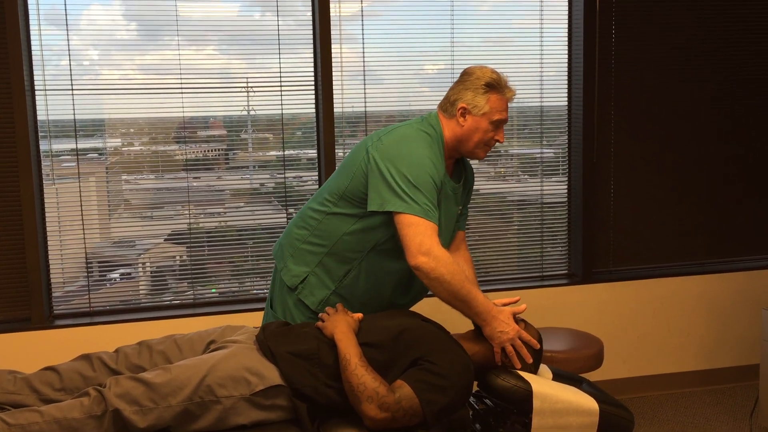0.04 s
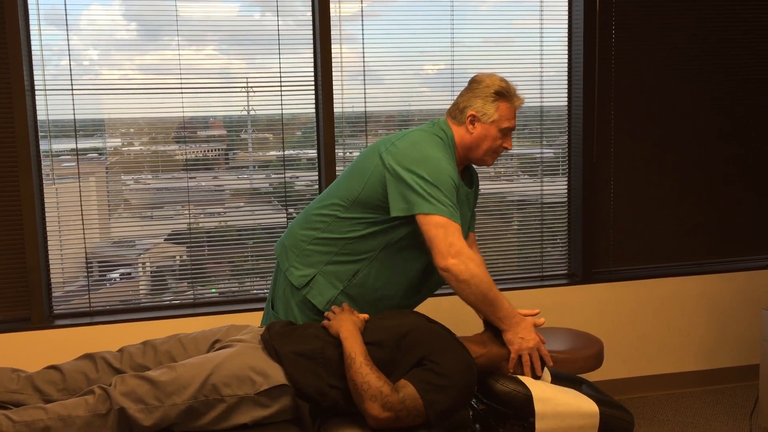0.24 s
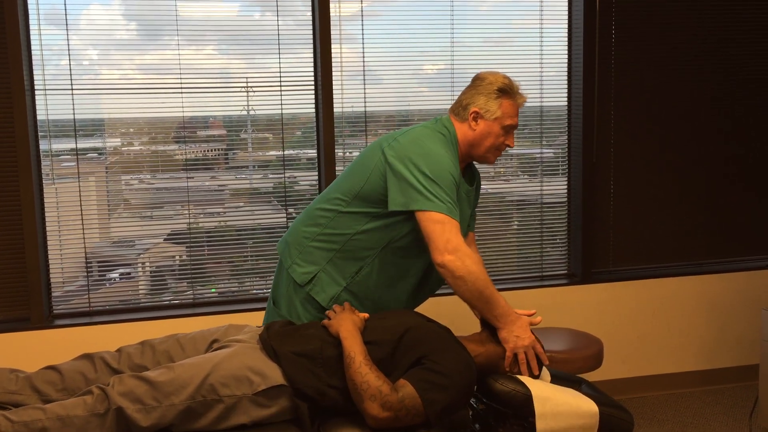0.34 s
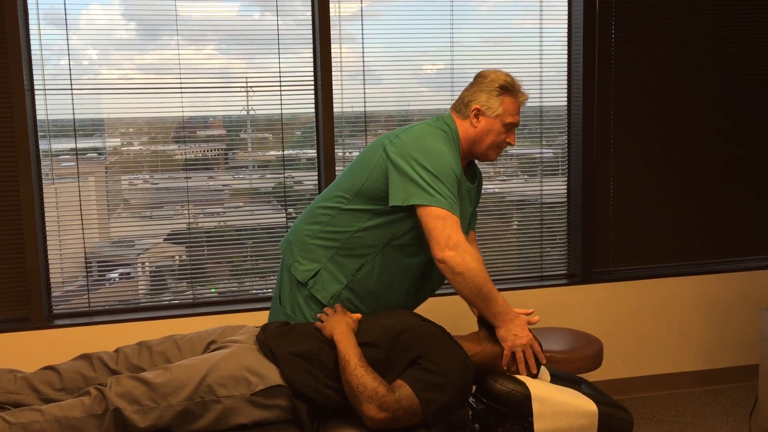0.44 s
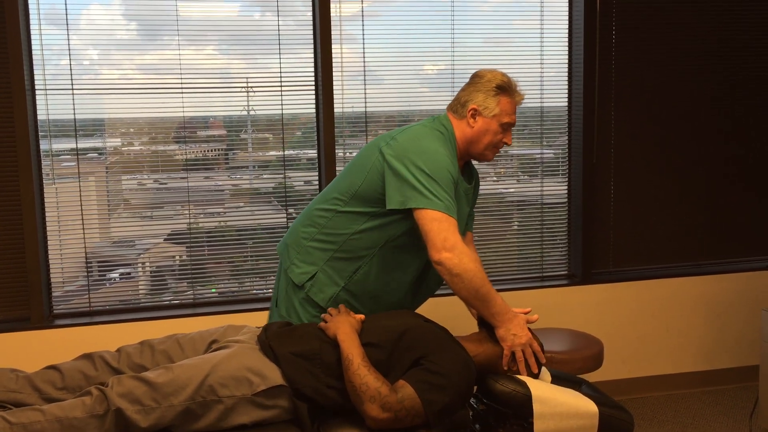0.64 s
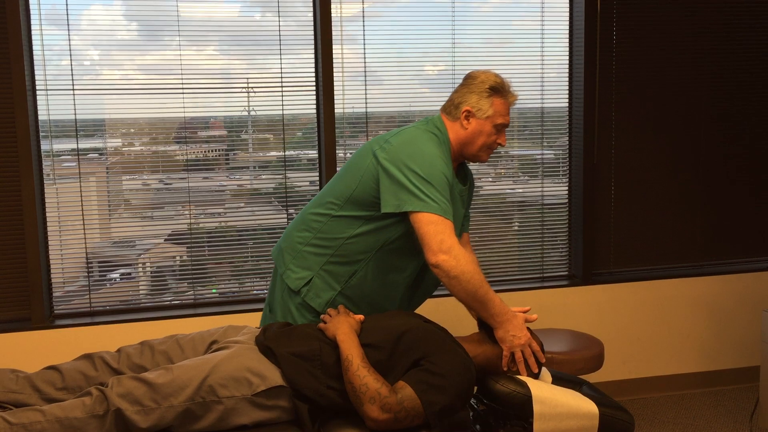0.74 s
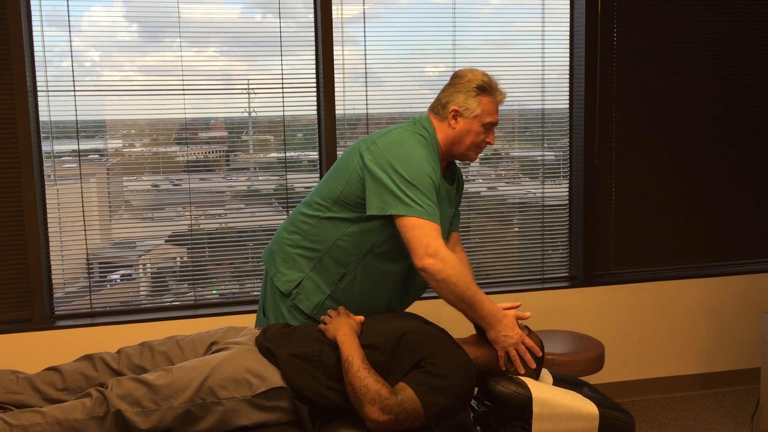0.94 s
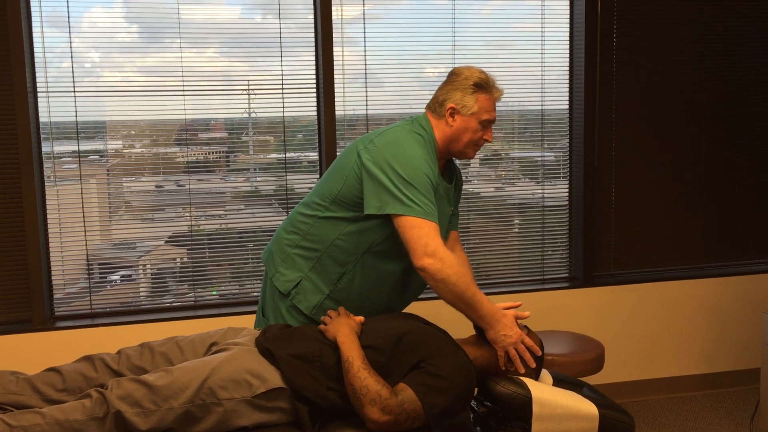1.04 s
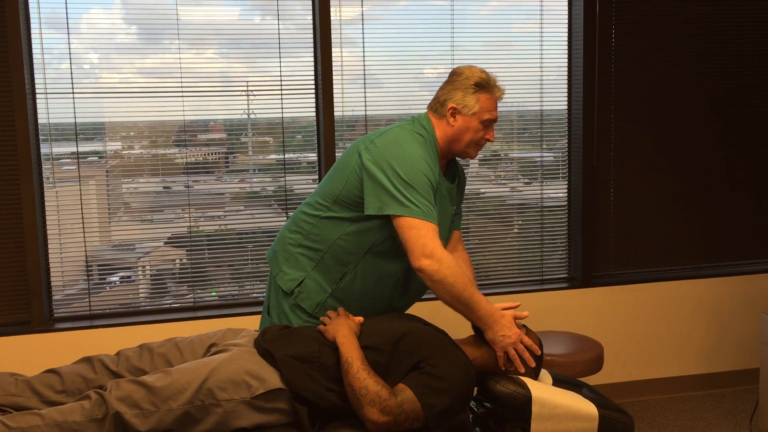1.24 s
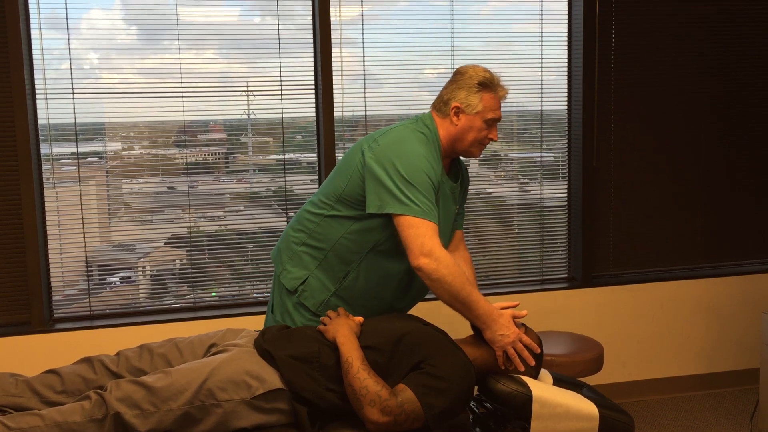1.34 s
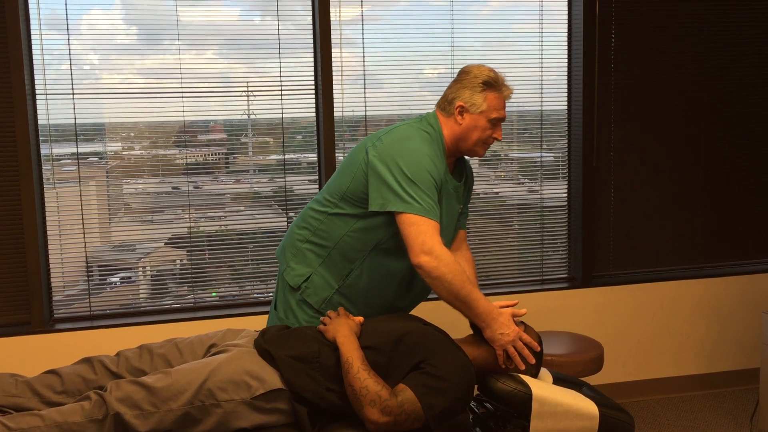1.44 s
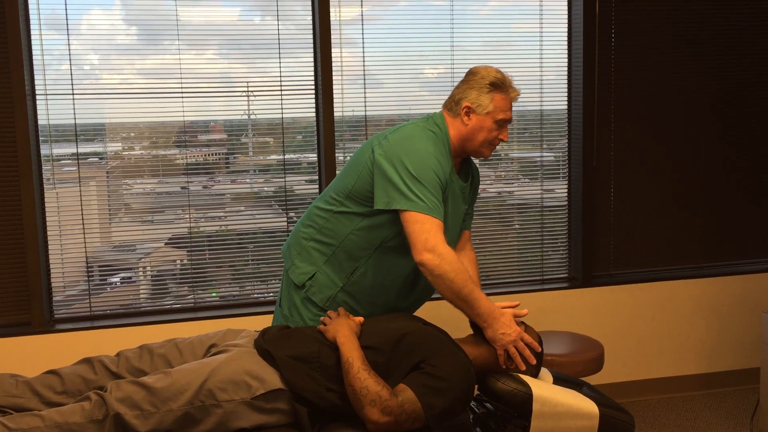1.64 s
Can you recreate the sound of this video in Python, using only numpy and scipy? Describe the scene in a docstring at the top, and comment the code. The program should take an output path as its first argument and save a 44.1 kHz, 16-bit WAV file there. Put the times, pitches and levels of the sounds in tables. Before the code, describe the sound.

A padded treatment table section scrapes briefly and drops with a loud thud and clack at about 0.25 seconds, ringing shortly in a small room. Headrest paper and upholstery rustle, tick and squeak faintly from 0.4 to 1.3 seconds. At 1.4 seconds the mechanism gives a lighter, hollow knock, and a brief bright metal clatter starts near 1.7 seconds. Low ventilation rumbles quietly throughout.

```python
"""Treatment table drop

In a small clinic room, a padded head section slides and drops onto its stop with a loud thud and clack.
Upholstery and headrest paper rustle, squeak and creak faintly under the hands. The mechanism knocks once
more, lighter and hollower, and a bright metal clatter starts. Ventilation rumbles underneath."""
import sys
import numpy as np
from scipy import signal
from scipy.fft import rfft, irfft
from scipy.io import wavfile
from scipy.ndimage import uniform_filter1d

SR = 44100
rng = np.random.default_rng(int(sys.argv[2]) if len(sys.argv) > 2 else 0)


def output_pcm(signal):
    """Save a mono or channel-first signal as 16-bit PCM at the path in sys.argv[1].

    Samples are clipped to [-1, 1] before scaling.
    """
    pcm = np.clip(np.atleast_2d(signal).T, -1, 1) * 32767
    wavfile.write(sys.argv[1], SR, np.round(pcm).astype(np.int16))


N = 74970


def drop(clack_db=10, thud_db=10):
    """The section hits its stop, rattles and rings; the cushion bounces."""
    hits = [(0.2391, 3), (0.2453, -13), (0.2497, -14), (0.2565, -14.5)]  # contacts with the stop (time [s], level [dB])
    clack_eq = [(50, -13), (100, -5.5), (160, 5.5), (280, 1), (400, 8), (600, 3.5), (780, 3.5), (1000, -3),
                (1380, 6), (1800, -2), (2350, 2), (3200, 1), (4500, 2.5), (5400, -0.5), (7200, -2),
                (9400, 1), (10600, -13.5), (14000, -10.5), (16000, -22)]  # contact spectrum (frequency [Hz], gain [dB])
    bounces = [(0.256, -18), (0.28, -8), (0.313, -15.5), (0.385, -35), (0.44, -44)]  # cushion bounces (time [s], level [dB])
    thud_eq = [(35, -25.5), (80, 11), (160, 13.5), (220, 15), (300, 8.5), (420, 9), (800, 7.5), (1400, -11),
               (5000, -39.5)]  # bounce spectrum (frequency [Hz], gain [dB])
    modes = [(167, -25.5, .42), (216.2, -30.5, .36), (250.4, -31.5, .3), (341, -31, 0.25), (439.7, -34, .3),
             (590, -25, .22), (769, -32.5, 0.3), (1342, -28, .21), (1582, -30.5, .19), (2088, -30.5, 0.23),
             (2140, -31, 0.25), (2430, -27.5, 0.23), (2874, -28.5, 0.15), (3616, -34, 0.24),
             (3680, -26.5, 0.13), (4284, -31, .24), (4610, -24, 0.14), (4880, -34.5, 0.35),
             (5630, -30, 0.16), (6750, -28, .13), (7750, -35, .17), (8180, -25, 0.13), (9460, -32, 0.18),
             (10691, -38, .18)]  # section modes (frequency [Hz], level [dB], t60 [s])
    clack = amp(clack_db) * colour(struck(hits, t60_s=0.033, wet_db=-3.5), clack_eq)
    thud = amp(thud_db) * colour(struck(bounces, t60_s=0.082, wet_db=-2), thud_eq)
    return clack + thud + ring(modes, start_s=hits[0][0])


def knock(gain_db=10):
    """A lighter, hollow knock of the mechanism rings the frame."""
    hits = [(1.4223, -18), (1.4243, -10.5), (1.4318, -31), (1.462, -28)]  # mechanism contacts (time [s], level [dB])
    eq = [(70, -17.5), (140, -6), (230, 13), (370, 1.5), (500, 8), (690, 9.5), (960, 9.5), (1300, -7),
          (1650, 7), (2100, 5), (2300, 1), (2800, 5.5), (3250, -5.5), (3650, 0), (4200, -10), (5400, -5),
          (7000, -9.5), (8800, -9), (10500, -19.5), (14000, -19), (16000, -36.5)]  # contact spectrum (frequency [Hz], gain [dB])
    modes = [(221.7, -45, 0.42), (478, -41, 0.28), (579, -35.5, 0.2), (888, -47.5, 0.28), (962, -45, 0.46),
             (1668, -40.5, 0.3), (2015, -46, .24), (2141, -40, 0.21), (2410, -46, .21), (2720, -33.5, 0.16),
             (3670, -42, 0.2), (4750, -44.5, 0.23), (5500, -46.5, 0.28), (5660, -53, 0.3),
             (7970, -38, 0.14), (8630, -50, 0.17)]  # frame modes (frequency [Hz], level [dB], t60 [s])
    impact = amp(gain_db) * colour(struck(hits, t60_s=0.025, wet_db=-1), eq)
    return impact + ring(modes, start_s=hits[0][0])


def clatter(gain_db=13):
    """Metal parts of the mechanism chatter brightly."""
    hits = [(1.6871, -30), (1.6895, -29), (1.693, -29.5), (1.6968, -46)]  # metal contacts (time [s], level [dB])
    eq = [(40, -28), (90, -13), (160, 30.5), (320, 7.5), (650, 7.5), (1200, -2), (2200, 5), (4200, -0.5),
          (5400, 6), (7200, 7.5), (9300, 8), (10500, -7.5), (14700, -1.5), (16000, -23.5)]  # contact spectrum (frequency [Hz], gain [dB])
    return amp(gain_db) * colour(struck(hits, t60_s=0.042, wet_db=0), eq)


def slide():
    """The section scrapes briefly as it gives way before the drop."""
    levels = [(.175, -80), (.2, -56.5), (.22, -52.5), (.237, -46.5), (.245, -72)]  # scrape envelope (time [s], level [dB])
    eq = [(60, -5), (170, 10.5), (400, 4.5), (700, 7), (1800, 5), (3500, 3.5), (6000, 2.5), (9300, 1),
          (10600, -7.5), (15000, -10)]  # scrape spectrum (frequency [Hz], gain [dB])
    return room(colour(friction(levels), eq), wet_db=-14.5)


def rustle(crinkle_db=-3, tick_db=14):
    """Paper and upholstery crinkle under the hands, with a few larger ticks."""
    levels = [(0, -69.5), (.13, -68), (.2, -72), (.45, -58), (.58, -68.5), (.7, -77), (.775, -89),
              (.79, -60), (.815, -65), (.845, -58), (.89, -63.5), (.97, -66.5), (1.02, -72), (1.08, -69),
              (1.13, -102), (1.17, -86), (1.26, -89), (1.33, -69), (1.68, -71)]  # crinkle envelope (time [s], level [dB])
    hits = [(.428, -39), (.787, -51), (.8323, -45), (.8607, -76), (.9675, -54), (1.154, -60),
            (1.3177, -48.5), (1.602, -77)]  # paper and upholstery ticks (time [s], level [dB])
    eq = [(150, -21), (500, 10), (900, 3.5), (1800, -1), (4000, -1.5), (7000, -0.5), (9300, -1),
          (10600, -10), (15000, -13.5)]  # rustle spectrum (frequency [Hz], gain [dB])
    crinkles = amp(crinkle_db) * friction(levels)
    ticks = amp(tick_db) * contacts(hits, t60_s=0.029)
    return room(colour(crinkles + ticks, eq), wet_db=-13)


def squeaks(waver_rms=0.079):
    """The upholstery sticks and slips in short wavering tones."""
    slips = [(.785, 0.014, 3490, -59), (.91, 0.022, 500, -55.5), (.968, 0.014, 6570, -62.5),
             (.97, 0.016, 6000, -70.5), (1.155, 0.023, 8540, -75)]  # squeaks (time [s], length [s], pitch [Hz], level [dB])
    out = np.zeros(N)
    for start_s, length_s, hz, db in slips:
        n = round(length_s * SR)
        waver = unit(uniform_filter1d(rng.standard_normal(SR), size=40))[:n]
        pitch_hz = hz * (1 + waver_rms * waver)
        tone = np.sin(2 * np.pi * np.cumsum(pitch_hz) / SR)
        add(out, start_s, amp(db) * np.hanning(n) * tone)
    return room(out, wet_db=-13)


def padding():
    """The foam gives with a dull, grainy rub as weight shifts."""
    shifts = [(.11, 0.038, -62.5), (0.822, 0.14, -68.5), (1.29, 0.12, -61)]  # foam creaks (time [s], length [s], level [dB])
    eq = [(50, -14.5), (140, -2), (300, 0.5), (480, -14.5), (1000, -10.5), (1600, -15.5), (5000, -39.5)]  # creak spectrum (frequency [Hz], gain [dB])
    out = np.zeros(N)
    for start_s, length_s, db in shifts:
        n = round(length_s * SR)
        rub = unit(colour(rng.standard_normal(SR // 4), eq))[:n]
        add(out, start_s, amp(db) * np.hanning(n) * rub)
    return room(out, wet_db=-1.5)


def ventilation(rms_db=-45.5):
    """Moving air: a steady low rumble with a little hiss."""
    eq = [(8, 14.5), (16, 1), (30, -1), (60, -2.5), (90, -12.5), (130, -8.5), (180, -15.5), (300, -23),
          (600, -27.5), (1100, -31.5), (2000, -35.5), (4000, -45.5), (9000, -49.5), (11000, -52),
          (16000, -64)]  # air noise spectrum (frequency [Hz], relative level [dB])
    gain = amp(read(eq, np.fft.rfftfreq(N, 1 / SR)))
    spectrum = rfft(rng.standard_normal(N)) * gain
    return amp(rms_db) * unit(irfft(spectrum, N))


def struck(hits, t60_s, wet_db):
    """Each contact gives a dry crack; the room answers its sharp onset."""
    onsets = np.zeros(N)
    for start_s, db in hits:
        add(onsets, start_s, amp([db]))
    return contacts(hits, t60_s) + echoes(onsets, wet_db)


def contacts(hits, t60_s, rise_s=0.00034):
    """One short crack of dense, quickly damped vibration per contact."""
    out, t = np.zeros(N), np.arange(SR // 8) / SR
    envelope = (1 - np.exp(-t / rise_s)) * amp(-60 * t / t60_s)
    for start_s, db in hits:
        add(out, start_s, amp(db) * burst(envelope))
    return out


def ring(modes, start_s, rise_s=0.0004):
    """Damped modes set ringing by one blow, at random phases."""
    out, t = np.zeros(N), np.arange(SR) / SR
    attack = 1 - np.exp(-t / rise_s)
    for hz, db, t60_s in modes:
        tone = np.sin(2 * np.pi * (hz * t + rng.random()))
        add(out, start_s, amp(db - 60 * t / t60_s) * attack * tone)
    return out


def friction(levels, slips_per_s=10000, spread_db=1):
    """A dense stream of tiny, uneven slips following a level curve."""
    size_db = spread_db * np.minimum(rng.exponential(1, N), 4)
    slips = amp(size_db) * rng.standard_normal(N)
    slipping = rng.random(N) < slips_per_s / SR
    envelope_db = np.interp(np.arange(N) / SR, *np.transpose(levels), left=-120, right=-120)
    return unit(slips * slipping) * amp(envelope_db)


def room(x, wet_db):
    """Direct sound plus its echoes."""
    return x + echoes(x, wet_db)


def echoes(x, wet_db, delay_s=0.0036, rise_s=0.0023, early_t60_s=0.11):
    """Early reflections of unit energy, plus a tail at wet_db whose bands decay at their own rates."""
    decays = [(100, 0.82), (250, 0.61), (600, .42), (1500, 0.44), (4000, 0.5), (8000, 0.43), (14000, .32)]  # room decay (frequency [Hz], t60 [s])
    t, hz = np.arange(SR) / SR, np.fft.rfftfreq(SR, 1 / SR)
    noise = rfft(rng.standard_normal(SR))
    log_centres = np.log([centre_hz for centre_hz, _ in decays])
    tail = np.zeros(SR)
    for band, (_, t60_s) in zip(np.eye(len(decays)), decays):
        band_gain = np.interp(np.log(hz + 1), log_centres, band)
        tail += irfft(noise * band_gain, SR) * amp(-60 * t / t60_s)
    rise = 1 - np.exp(-np.maximum(t - delay_s, 0) / rise_s)
    early = burst(rise * amp(-60 * t / early_t60_s))
    late = amp(wet_db) * rise * tail / np.linalg.norm(tail)
    return signal.fftconvolve(x, early + late)[:N]


def burst(envelope, passes=5):
    """Unit-energy noise under an envelope, with a nearly flat spectrum."""
    x = rng.standard_normal(len(envelope)) * envelope
    for _ in range(passes):
        spectrum = rfft(x)
        x = irfft(spectrum / (abs(spectrum) + 1e-12), len(x))  # whiten
        local_rms = np.sqrt(abs(uniform_filter1d(x ** 2, size=64)) + 1e-14)
        x *= envelope / local_rms
    return x / np.linalg.norm(x)


def colour(x, eq, size=8192):
    """Minimum-phase filter with the given gain curve."""
    hz = abs(np.fft.fftfreq(size, 1 / SR))
    log_gain = np.log(amp(read(eq, hz)))
    response = np.exp(np.conj(signal.hilbert(log_gain)))
    taps = np.fft.ifft(response).real[:size // 2]
    return signal.fftconvolve(x, taps)[:len(x)]


def read(points, hz):
    """Interpolates a table on a log-frequency axis."""
    points_hz, values = np.transpose(points)
    return np.interp(np.log(hz + 1), np.log(points_hz + 1), values)


def add(mix, start_s, sound):
    """Mixes a sound in at start_s."""
    part = mix[round(start_s * SR):][:len(sound)]
    part += sound[:len(part)]


def amp(db):
    """Decibels to gain."""
    return 10 ** (np.asarray(db) / 20)


def unit(x):
    """Scales to unit rms."""
    return x / np.sqrt(np.mean(x ** 2) + 1e-20)


def scene():
    """All sources, summed to mono."""
    mechanism = slide() + drop() + knock() + clatter()
    return (mechanism + rustle() + squeaks() + padding() + ventilation())[None]


def record(dry, cutoff_hz=16000):
    """Low-pass band limit."""
    taps = signal.firwin(255, cutoff_hz, window=("kaiser", 9), fs=SR)
    return signal.oaconvolve(dry, taps[None], "same")


dry = scene()
out = record(dry)
output_pcm(out)
```